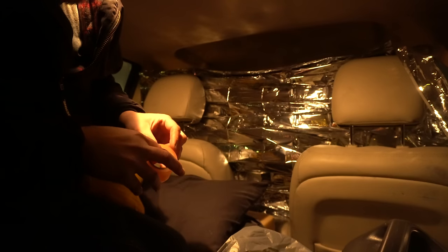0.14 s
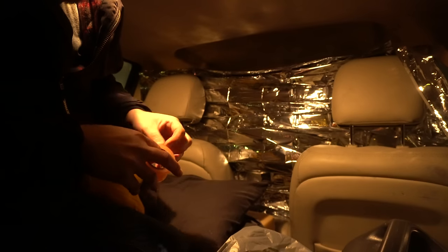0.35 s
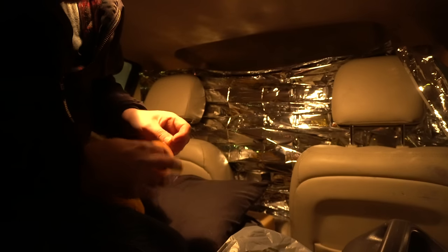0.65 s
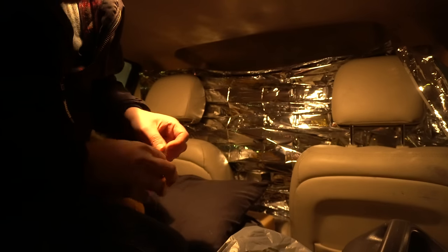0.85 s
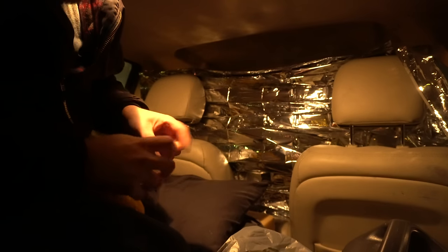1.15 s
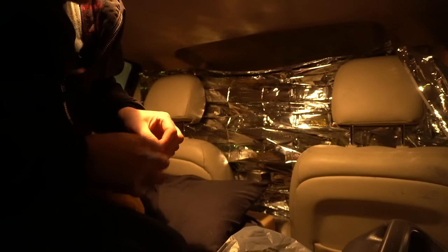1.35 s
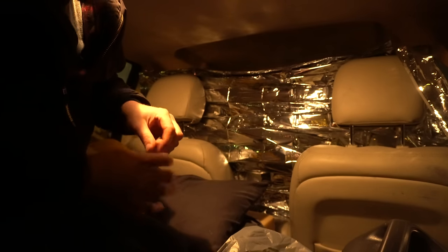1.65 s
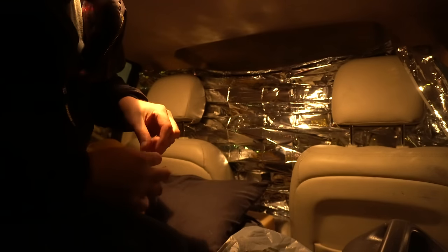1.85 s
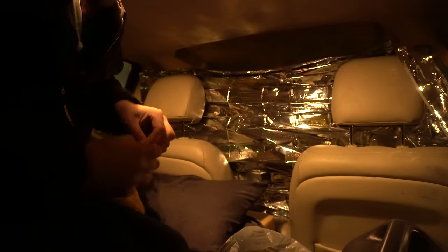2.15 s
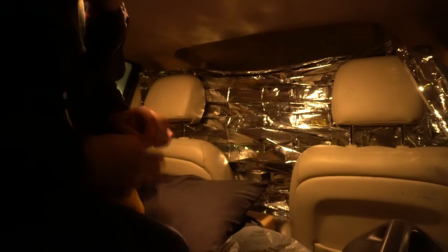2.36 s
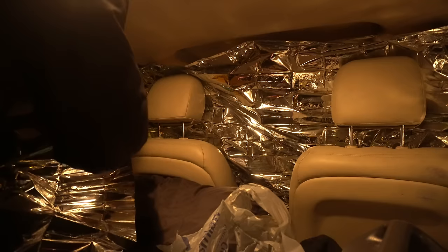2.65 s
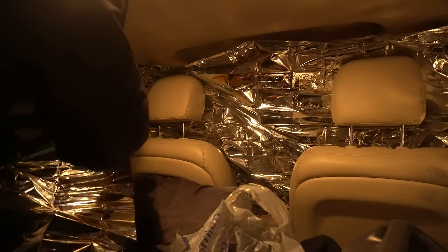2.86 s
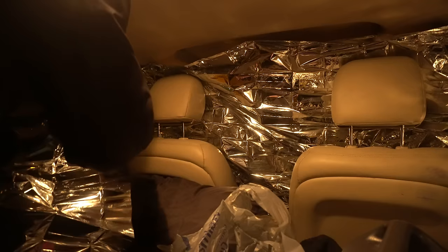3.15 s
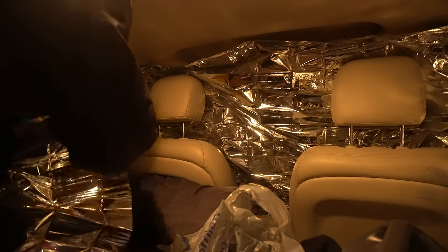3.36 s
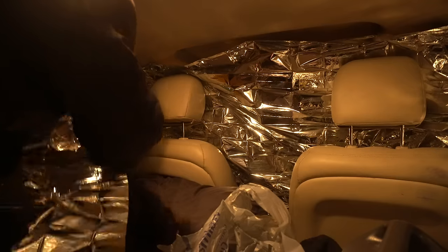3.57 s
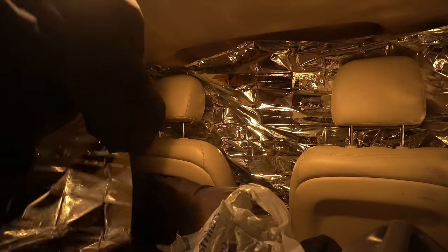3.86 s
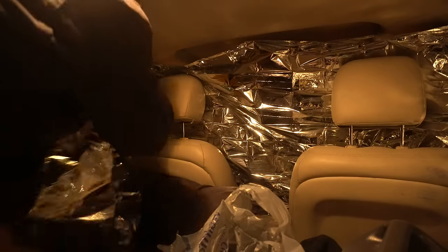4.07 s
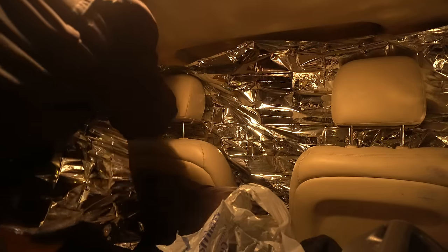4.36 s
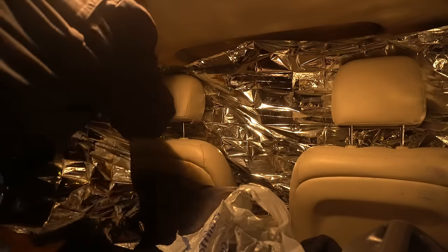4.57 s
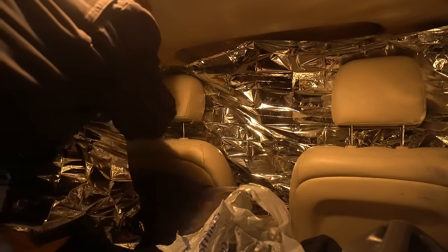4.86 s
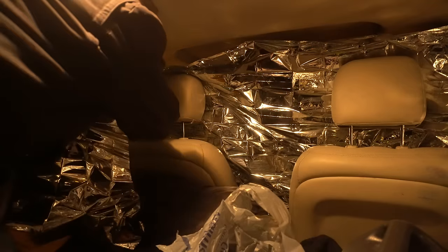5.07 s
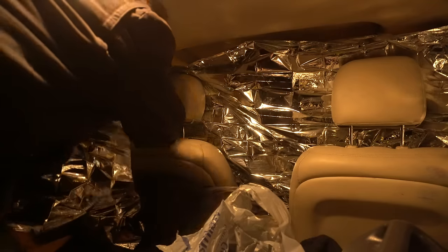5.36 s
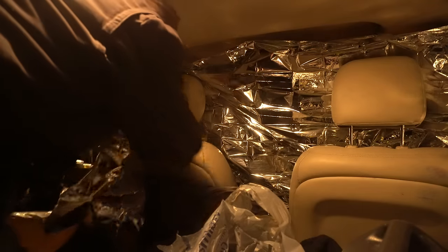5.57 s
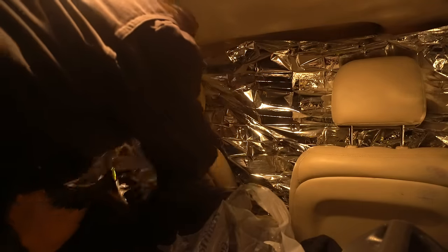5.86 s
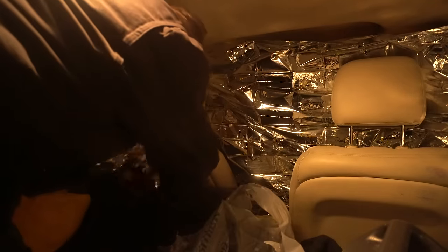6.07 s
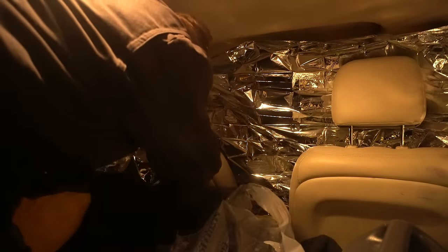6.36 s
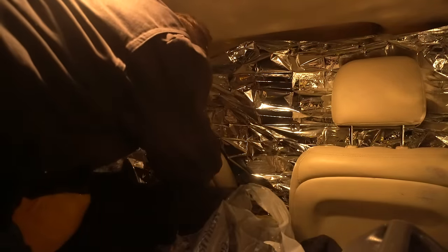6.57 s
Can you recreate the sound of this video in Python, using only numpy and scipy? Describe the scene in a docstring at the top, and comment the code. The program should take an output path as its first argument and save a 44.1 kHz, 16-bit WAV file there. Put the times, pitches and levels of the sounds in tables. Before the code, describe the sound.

Inside a parked car, tape is picked and pulled loose before a thin foil sheet is handled and pressed, crackling softly.

```python
"""Tape and foil in a parked car

Close by in the padded cabin, fingers pick at sticky tape and its glue lets go in short rips. Then thin
foil is pressed and crumpled against the windows, its creases buckling in clicks. Clothes and seats
rustle, a seat thumps, and the cabin answers briefly over a low outside rumble. One microphone hears it."""
import sys
import numpy as np
from scipy import signal
from scipy.fft import rfft, irfft, next_fast_len
from scipy.io import wavfile
from scipy.ndimage import uniform_filter1d, map_coordinates

SR = 44100
rng = np.random.default_rng(int(sys.argv[2]) if len(sys.argv) > 2 else 0)


def waveform_to_disk(signal):
    """Save audio, clipped to [-1, 1], as 16-bit WAV at the path in sys.argv[1]."""
    frames = np.transpose(np.atleast_2d(signal))
    scaled = np.clip(frames, -1, 1) * 32767
    samples = np.round(scaled).astype(np.int16)
    wavfile.write(sys.argv[1], SR, samples)


N = 295470

# How loudly the sheet crinkles; at 2.65 s the whole scene cuts to a quieter moment.
# Each row: time in seconds, level in dB.
CRINKLE_LEVEL = [(0, -93), (.3, -67.5), (.55, -59.5), (.85, -63), (.96, -52), (1.2, -61.5), (1.4, -57.5),
                 (2.2, -59), (2.35, -52.5), (2.64, -48.5), (2.65, -63), (3.1, -52.5), (3.5, -50),
                 (3.87, -42.5), (4.0, -34), (4.12, -37.5), (4.4, -48.5), (4.7, -46.5), (4.9, -58.5),
                 (5.3, -62), (5.5, -47.5), (6.0, -43.5), (6.25, -50), (6.7, -49.5)]


def amp(db):
    """Gain of a level in dB."""
    return 10 ** (np.asarray(db) / 20)


def curve(rows):
    """One value per sample along (seconds, value) points."""
    return np.interp(np.arange(N) / SR, *np.transpose(rows))


def wobble(rate):
    """A smooth random curve, rate knots a second."""
    return map_coordinates(rng.standard_normal(int(N * rate / SR) + 4), [np.arange(N) * rate / SR])


def coloured(x, points):
    """x through a spectrum of (Hz, dB) points on a log axis, at rms 1."""
    m = next_fast_len(N + 8192)
    hz, db = np.transpose(points)
    gain = amp(np.interp(np.log(np.fft.rfftfreq(m, 1 / SR) + 1), np.log(hz), db, left=-120))
    shaped = irfft(rfft(x, m) * gain, m)[:N]
    return shaped / np.sqrt(np.mean(shaped ** 2) + 1e-20)


def outside_rumble():
    """Low rumble from outside comes through the car body."""
    # Each row: time in seconds, level in dB.
    level = [(0, -50.5), (1.4, -50), (2.3, -44), (2.64, -49.5), (2.65, -57), (5.7, -56), (6, -51),
             (6.7, -56)]
    # Each row: frequency in Hz, relative level in dB.
    spectrum = [(10, -14), (25, -5), (48, -4), (58, -9), (90, -33), (150, -47)]
    return amp(curve(level)) * coloured(rng.standard_normal(N), spectrum)


def seat_thumps():
    """Each push into the seat is a few soft cycles that swell and fade."""
    # Each row: time of the peak in seconds, pitch in Hz, peak in dB, length in seconds.
    pushes = [(3.567, 100, -46, .016), (3.602, 120, -46, .02), (3.616, 250, -45, .012),
              (3.615, 750, -45, .008), (3.674, 230, -45, .012), (5.496, 150, -46, .02),
              (5.875, 100, -42, .04), (5.973, 215, -31, .02), (6.011, 140, -30.5, .055),
              (6.039, 370, -39, .014), (6.062, 65, -42, .04)]
    t = np.arange(N) / SR
    return sum(amp(db) * np.exp(-8 * ((t - s) / length) ** 2) * np.cos(2 * np.pi * hz * (t - s))
               for s, hz, db, length in pushes)


def cloth_rustle():
    """Clothes and seats rub in a smooth, gently wavering noise."""
    # Each row: time in seconds, level in dB.
    level = [(0, -64), (.5, -52.5), (1.25, -60), (1.6, -49), (2.2, -53.5), (2.45, -46), (2.64, -38),
             (2.65, -62), (3.3, -62), (3.64, -50), (3.8, -54.5), (4.3, -53), (4.9, -62.5), (5.4, -62),
             (6.0, -46), (6.2, -57), (6.7, -58)]
    # Each row: frequency in Hz, relative level in dB.
    spectrum = [(70, 1), (120, -1.5), (300, 1), (700, -3.5), (1300, -5.5), (2500, -13), (6000, -31)]
    rub = rng.standard_normal(N) * amp(1.5 * wobble(20))
    return amp(curve(level)) * coloured(rub, spectrum)


def crackle(spread_db, wet_db, t60):
    """Countless small buckles; each spot on the sheet has its own cabin echo."""
    size = np.clip(rng.standard_normal(N), -3, 2.3)
    clicks = rng.standard_normal(N) * amp(spread_db * size)
    block = 512  # samples of clicks that share one spot
    spots = np.pad(clicks, (0, -N % block)).reshape(-1, block)
    t = np.arange(3072) / SR
    tails = rng.standard_normal((len(spots), len(t))) * amp(-60 * t / t60)
    echoes = signal.fftconvolve(spots, tails / np.linalg.norm(tails[0]), axes=1)
    arrivals = block * np.arange(len(spots))[:, None] + np.arange(echoes.shape[1])
    return clicks + amp(wet_db) * np.bincount(arrivals.ravel(), echoes.ravel())[:N]


def sheet_crinkle():
    """The handled sheet's crinkle and its fine fizz come from the same buckles."""
    # Each row of both spectra: frequency in Hz, relative level in dB.
    crinkle_spectrum = [(150, -5), (900, 1.5), (1600, 4.5), (4000, 4.5), (7500, -4.5), (10000, -23),
                        (16000, -30)]
    fizz_spectrum = [(5000, -17), (8000, -5), (10500, -12.5), (13500, -8), (15300, -11.5), (16500, -5.5)]
    crinkle_db = curve(CRINKLE_LEVEL)
    fizz_db = -49.5 + 1.31 * (crinkle_db + 50)  # the fizz swings wider than the crinkle
    buckles = crackle(spread_db=10.5, wet_db=-5.0, t60=0.063)
    crinkle = amp(crinkle_db) * coloured(buckles, crinkle_spectrum)
    return crinkle + amp(fizz_db) * coloured(buckles, fizz_spectrum)


def add_volley(track, start, length, levels_db, bands, wet_db, fade_db, ring_hz):
    """Add a run of uneven clicks with its cabin tail, band by band, ringing at ring_hz if given."""
    spread_db, ring_db, ring_q = 8, 4, 6.6
    t = np.arange(SR // 6) / SR
    size, noise, reflections = rng.standard_normal((3, len(t)))
    clicks = noise * amp(spread_db * np.clip(size, -3, 2.4) - fade_db * t / length) * (t <= length)
    snap = 9 / (1 + length / .012)  # short volleys start with a strong break, long ones slide in
    clicks[0] = snap * np.sqrt(np.mean(clicks[t <= length] ** 2))
    m, lead = next_fast_len(2 * len(t)), 64
    octaves = np.log2(np.fft.rfftfreq(m, 1 / SR) + 1)
    centres = np.log2([120] + [hz for hz, _ in bands])  # the lowest band fades out at 120 Hz
    volley = np.zeros(len(t))
    for k, (db, (_, t60)) in enumerate(zip(levels_db, bands)):
        tail = reflections * amp(-60 * t / t60) * (t > .001)
        cabin = 1 + amp(wet_db) * rfft(tail / np.linalg.norm(tail), m)
        crossfade = np.interp(octaves, centres, np.arange(len(centres)) == k + 1) ** 0.99
        band = irfft(rfft(clicks, m) * cabin * crossfade, m)
        band = np.roll(band, lead)[:len(t)]  # room for the ripple ahead of the first click
        band /= np.sqrt(np.mean(band[lead:][t[:-lead] < length + .004] ** 2))
        volley += amp(db) * band
    if ring_hz:
        volley += amp(ring_db) * signal.lfilter(*signal.iirpeak(ring_hz, ring_q, SR), volley)
    track[round(start * SR) - lead:][:len(t)] += volley


def volleys(rows, colour_db, wet_db, fade_db):
    """One volley per row in the padded cabin, all of one colour, each tilted about 4.5 kHz."""
    # The cabin's decay. Each row: band centre in Hz, seconds to fall by 60 dB.
    bands = [(300, 0.094), (800, 0.053), (2000, 0.061), (4500, 0.054), (11000, 0.043)]
    track = np.zeros(N + SR)
    octaves = np.log2(np.transpose(bands)[0] / 4500)
    for start, length, db, tilt, ring_hz in rows:
        levels_db = db + np.array(colour_db) + tilt * octaves
        add_volley(track, start, max(length, .0005), levels_db, bands, wet_db, fade_db, ring_hz)
    return track[:N]


def foil_folds():
    """A crease buckles and sets off weaker neighbours; small random folds follow the crinkle's level."""
    # Folds that snap over or slide. Each row: start in seconds, length in seconds, base level in dB.
    main_folds = [(2.938, 0.0033, -58), (2.969, 0.0056, -58), (3.013, 0.0088, -57), (3.086, 0.0014, -34),
                  (3.1, 0.0088, -40), (3.121, 0.012, -40.5), (3.204, .0055, -48.5), (3.321, 0.0082, -48.5),
                  (3.429, 0.033, -48.5), (3.48, 0.024, -48.5), (3.613, 0.064, -43.5), (3.728, 0.021, -42.5),
                  (3.755, 0.008, -41), (3.785, .003, -40.5), (3.904, 0.024, -37.5), (3.923, 0.0028, -35.5),
                  (3.96, 0.045, -36.5), (4.06, 0.062, -37.5), (4.26, 0.0084, -38.5), (4.334, 0.01, -44.5),
                  (4.382, 0.0074, -43.5), (4.435, .0076, -43.5), (4.47, 0.0092, -43),
                  (4.6946, 0.0036, -38.5), (4.785, 0.033, -50), (4.838, .034, -49), (4.892, 0.0097, -52),
                  (4.948, .005, -55), (4.965, 0.0066, -59), (5.006, 0.016, -50), (5.092, 0.029, -54),
                  (5.129, 0.037, -53), (5.242, 0.006, -58), (5.462, 0.086, -46), (5.483, 0.029, -35.5),
                  (5.544, 0.026, -42), (5.574, 0.0039, -40), (5.682, 0.0016, -38), (5.6935, .011, -38),
                  (5.804, 0.11, -47), (5.956, 0.0036, -36.5), (6.036, 0.017, -42.5), (6.095, 0.018, -45.5),
                  (6.118, 0.033, -46), (6.205, .007, -45.5), (6.372, 0.075, -50.5), (6.505, 0.012, -44)]
    # A fold's colour: dB added in each cabin band, low to high.
    colour_db = [-25, -11.5, -6.5, -0.5, 2]
    folds_per_s, usual_length_s = 9, .008
    small_db = curve(CRINKLE_LEVEL) - 3
    gaps, stretches, sizes = rng.standard_normal((60, 3)).T
    starts = np.cumsum(np.exp(.6 * gaps) / 1.2) / folds_per_s + .02
    small_folds = [(s, usual_length_s * np.exp(0.67 * stretch), small_db[int(s * SR)] + 3 * size)
                   for s, stretch, size in zip(starts, stretches, sizes) if s < N / SR]
    rows = [(*fold, 0, None) for fold in main_folds + small_folds]  # no tilt, no ring
    return volleys(rows, colour_db, wet_db=-1.0, fade_db=2.5)


def tape_rips():
    """The glue lets go in volleys of tiny breaks, and the tape's free end rings."""
    # Slips and rips. Each row: start in seconds, length in seconds, base level in dB,
    # tilt in dB per octave, ring of the free end in Hz.
    rips = [(0.0186, .0055, -36, -4, 1660), (.09, .002, -61.5, 5, 3500), (.207, 0.0022, -73.5, -11, 1800),
            (.3546, 0.005, -55, 1, 1410), (.59, .0015, -32, 9, 13000), (.6, 0.00085, -26.5, 4, 2240),
            (.612, 0.0025, -22.5, 7, 6100), (.623, .0008, -25.5, 10, 4470), (.633, 0.012, -20, 3.5, 8800),
            (.647, .015, -16, 4, 5030), (.673, 0.0098, -12.5, 2, 1510), (.72, .014, -13.5, 1, 1800),
            (.76, 0.0088, -9.5, 1, 5480), (.839, .002, -51.5, -10, 1300), (.921, 0.0029, -25.5, -1, 1215),
            (.982, .012, -8.5, 3, 3060), (1.0127, 0.0057, -8.5, 1, 4300), (1.0437, 0.0026, -9, 2, 4200),
            (1.162, 0.0031, -40.5, -2, 4300), (1.333, 0.01, -34, -3.5, 4510),
            (1.392, 0.011, -51.5, -5, 3800), (1.501, 0.004, -58, -8.5, 1900),
            (1.538, 0.00096, -42.5, 0, 2170), (1.674, 0.0016, -48, -1.5, 3170),
            (1.744, 0.0023, -42, 4.5, 3730), (1.827, 0.0025, -43, 0, 4350), (1.9, 0.0024, -54.5, 3, 3200),
            (1.954, 0.0033, -53.5, 1, 3800), (1.983, 0.0065, -45, -6, 670), (2.002, 0.0063, -31.5, 4, 4080),
            (2.043, .006, -49, 3, 1500), (2.06, 0.002, -48.5, 7.5, 6460), (2.36, 0.0026, -50, -2, 5800),
            (2.421, 0.0017, -46.5, 5.5, 7700), (2.448, 0.0037, -34, 0, 3800),
            (2.457, 0.0064, -22.5, -2, 3630), (2.482, 0.0039, -12.5, -2.5, 3540),
            (2.538, 0.0022, -49, 5, 7400), (2.7605, 0.0046, -38, -1, 1600), (2.775, .0075, -45, 0, 3630),
            (2.802, .0037, -50, -2.5, 2400), (2.827, 0.003, -48.5, -2, 1720), (2.854, 0.0048, -62, 7, 4500),
            (2.89, 0.005, -46.5, 1, 2940)]
    # An untilted rip's colour: dB added in each cabin band, low to high.
    colour_db = [-28.5, -12.5, -5, 0, -0.5]
    return volleys(rips, colour_db, wet_db=0, fade_db=0.5)


def gain_control(x):
    """Loud moments pull the gain down within milliseconds; it climbs back at a steady pace."""
    threshold_db, share_of_excess, recovery_db_per_s = -33.5, 0.33, 21
    power = uniform_filter1d(x ** 2, size=441, origin=220)  # over the last 10 ms
    level_db = 10 * np.log10(np.abs(power) + 1e-12)
    wanted_cut_db = share_of_excess * np.maximum(level_db - threshold_db, 0)
    climb = recovery_db_per_s * np.arange(N) / SR
    cut_db = np.maximum.accumulate(wanted_cut_db + climb, axis=1) - climb
    return x * amp(-cut_db)


def scene():
    """All sources at one microphone inside the car."""
    tape_and_foil = tape_rips() + foil_folds() + sheet_crinkle()
    return (tape_and_foil + cloth_rustle() + seat_thumps() + outside_rumble())[None]


def record(dry):
    """Gain control acts, peaks round off near full scale, and the microphone loses the top treble."""
    # The microphone's roll-off. Each row: frequency in Hz, gain in dB.
    roll_off = [(12000, -1), (14500, -5), (15600, -9.5)]
    band_limit_hz = 15900
    held = gain_control(dry)
    rounded = held / (1 + np.abs(held / .97) ** 6) ** (1 / 6)
    m = next_fast_len(N + 8192)
    hz = np.fft.rfftfreq(m, 1 / SR)
    microphone = amp(np.interp(hz, *np.transpose(roll_off)))
    band_edge = np.clip((band_limit_hz + 150 - hz) / 300, 0, 1) ** 2
    return irfft(rfft(rounded, m) * microphone * band_edge, m)[:, :N]


dry = scene()
out = record(dry)
waveform_to_disk(out)
```